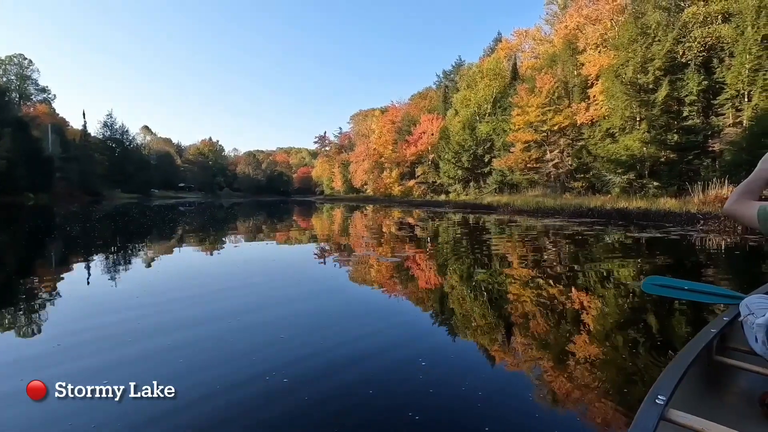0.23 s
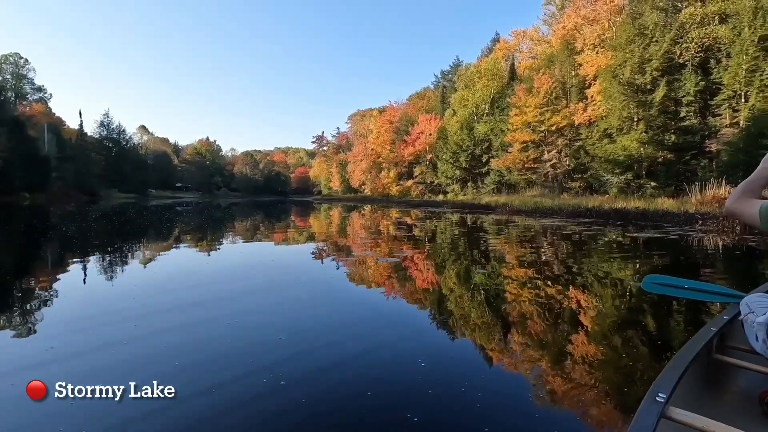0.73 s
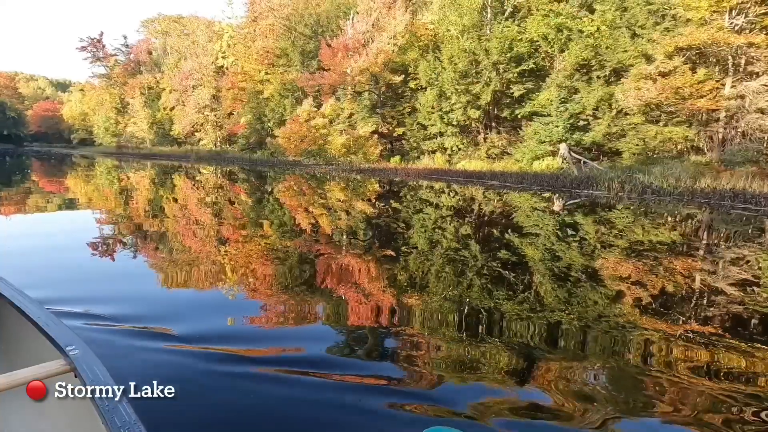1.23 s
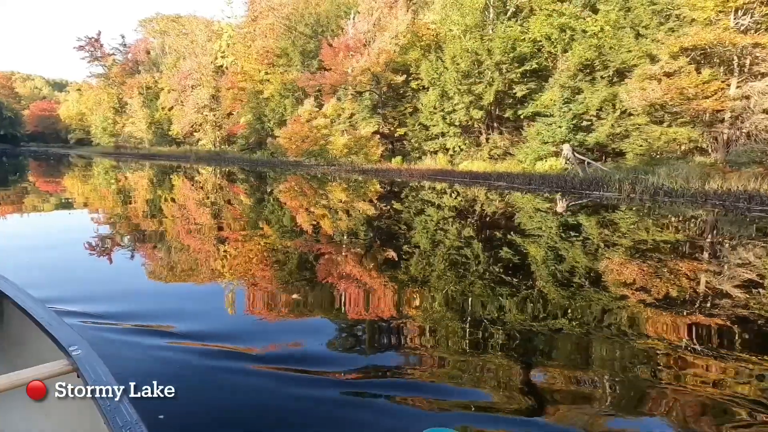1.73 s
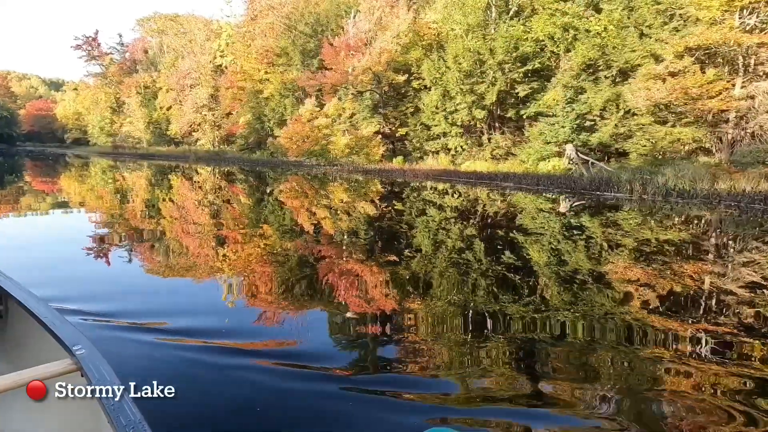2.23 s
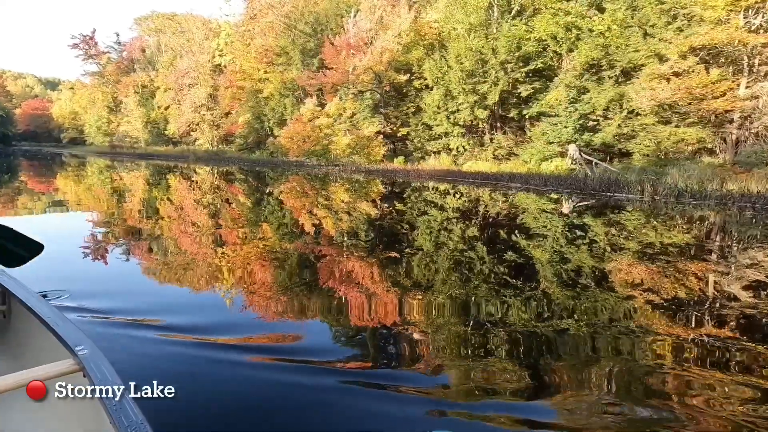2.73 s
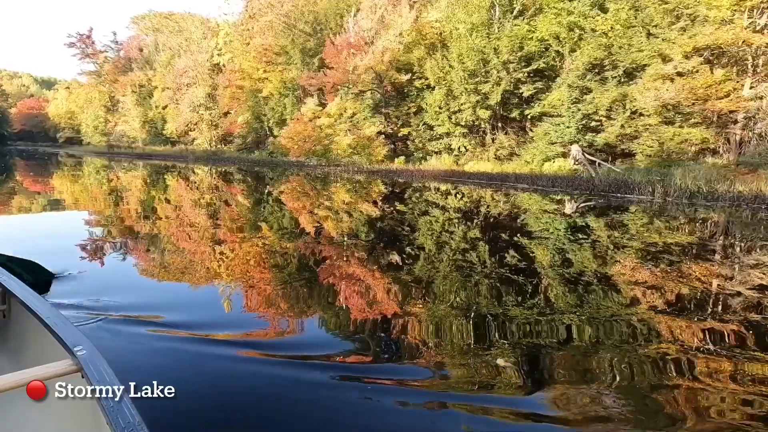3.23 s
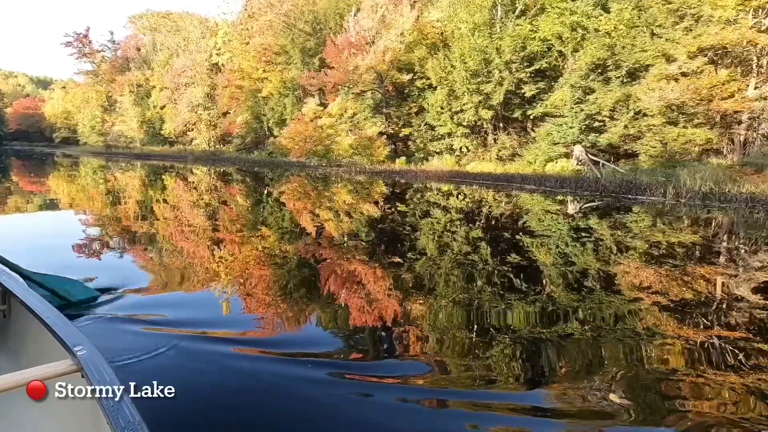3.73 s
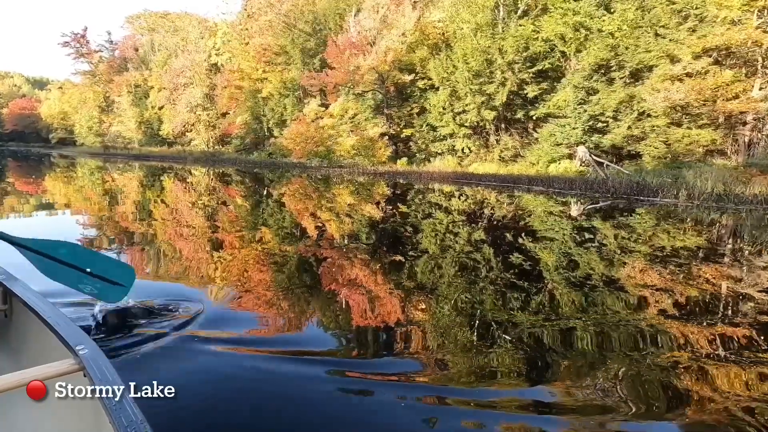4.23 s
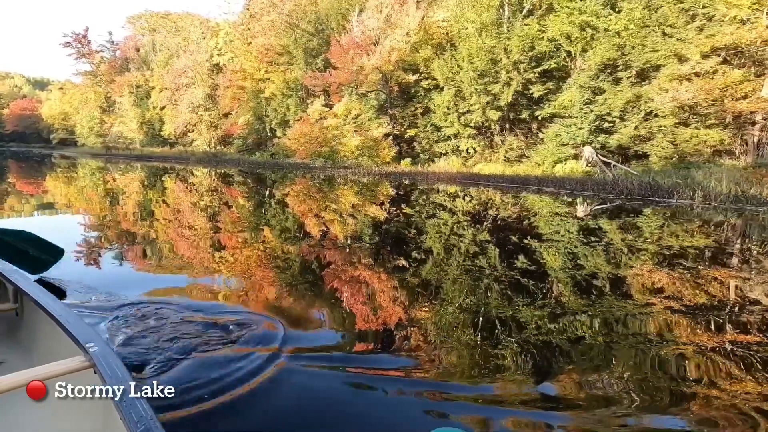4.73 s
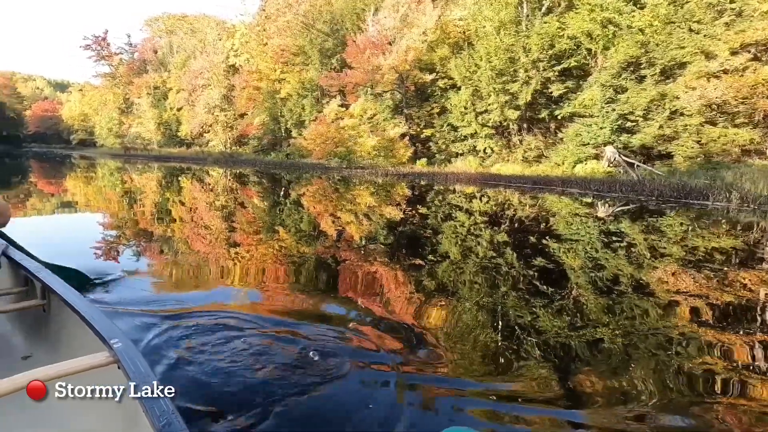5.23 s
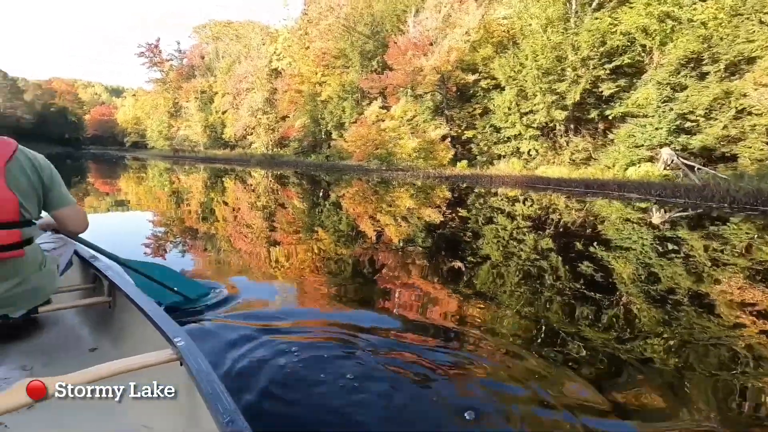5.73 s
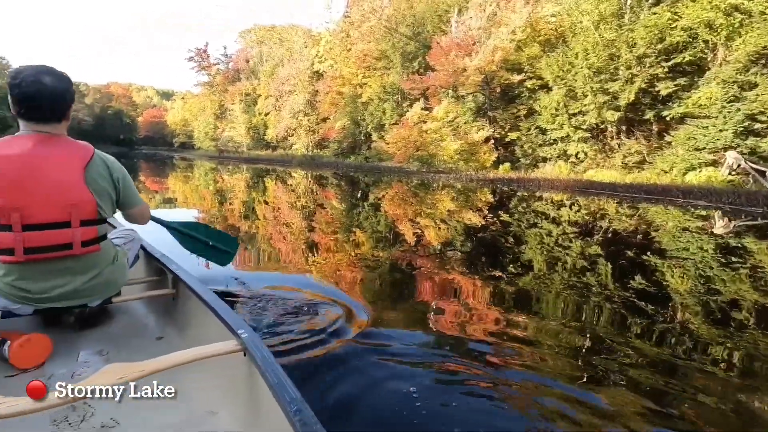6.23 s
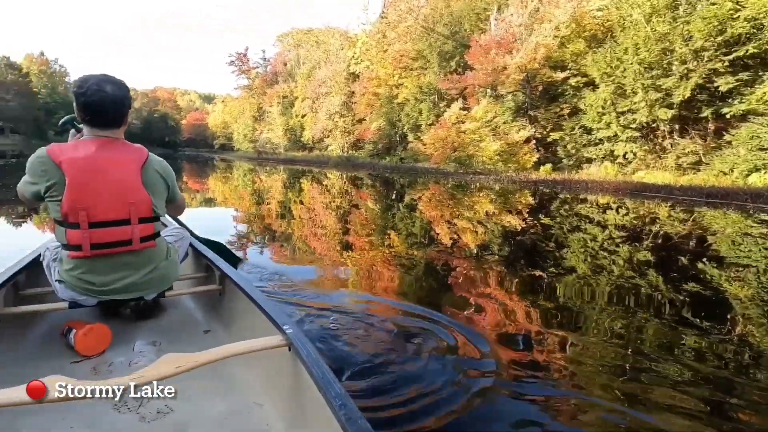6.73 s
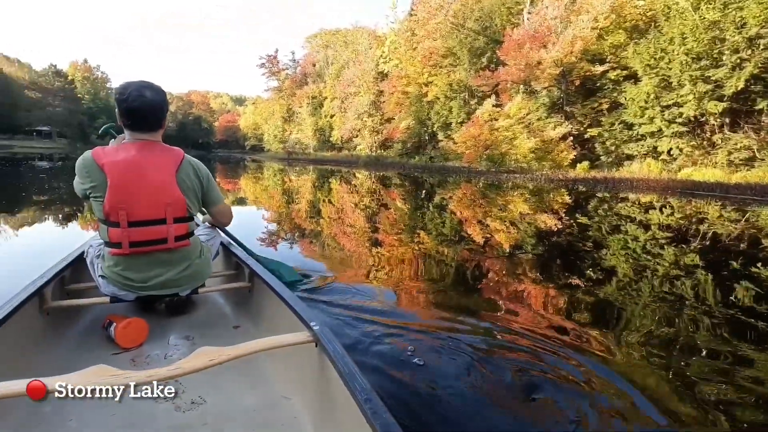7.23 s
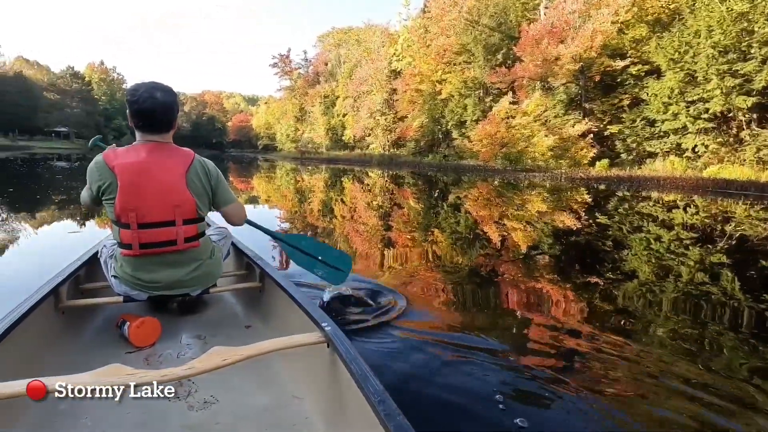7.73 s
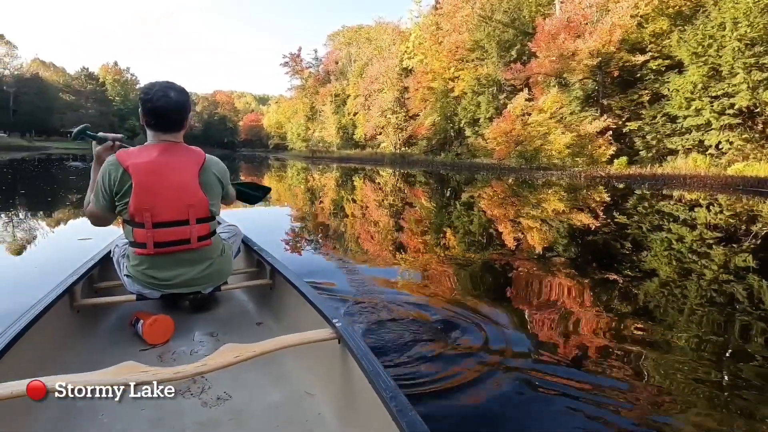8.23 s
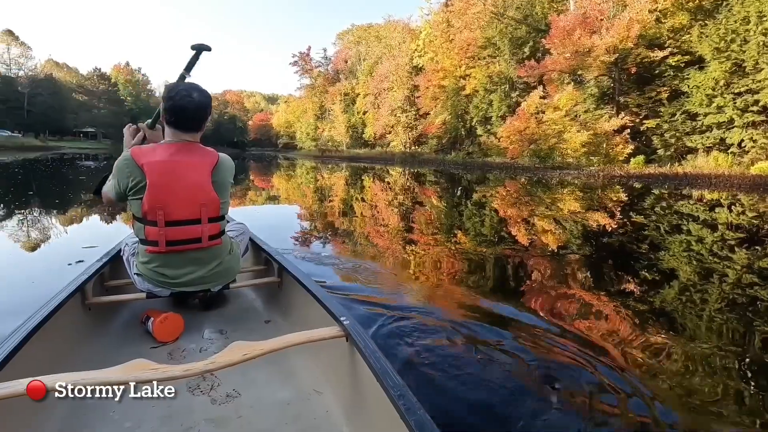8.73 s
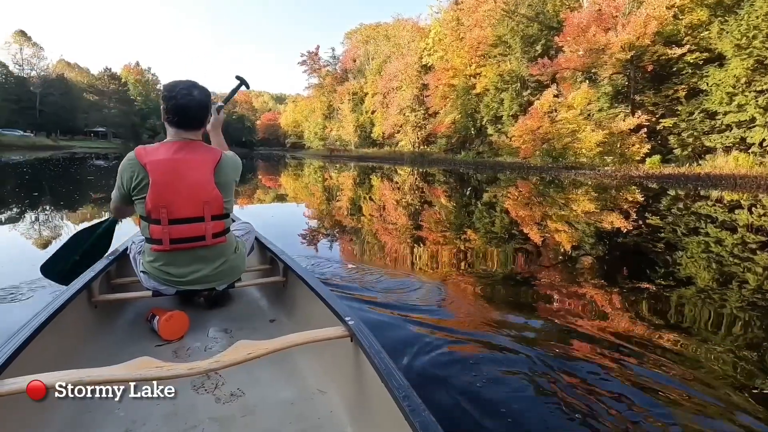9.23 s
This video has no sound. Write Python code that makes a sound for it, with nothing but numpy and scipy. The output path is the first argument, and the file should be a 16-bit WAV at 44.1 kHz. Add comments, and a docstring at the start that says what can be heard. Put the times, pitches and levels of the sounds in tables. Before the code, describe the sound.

Quiet outdoor lake ambience with soft wind rumble, nasal bird notes and chirps echoing off trees, and faint gliding motor drones. After a short gap of silence, a paddle close to the microphone plops, swirls and drips in three strokes of growing strength. A hollow boat knock booms between the first and second. The sound starts wide, becomes nearly mono, then gradually opens again and ends in a fade.

```python
"""On a calm lake, in the stern of a canoe: the paddle works close to a stereo microphone.
Strokes stir ringing bubbles, pattering drops and swishing noise; bumps set off the hull's decaying modes,
once loudly. Birds sing from the shore as harmonics, gliding tones and chirps, with an echo off the trees.
Far motors are gliding tones; rumble, rustle and hush are shaped noise. The sound fades out briefly,
comes back centred, slowly widens, and fades for good."""
import sys
import numpy as np
from scipy import signal
from scipy.fft import rfft, irfft, next_fast_len
from scipy.io import wavfile
from scipy.ndimage import uniform_filter1d

SR = 44100
rng = np.random.default_rng(int(sys.argv[2]) if len(sys.argv) > 2 else 0)


def inscribe(sig):
    """Save sig as 16-bit PCM at rate SR to the path in sys.argv[1].

    A 1-D sig is mono; a 2-D sig holds one channel per row.
    Samples are clipped to [-1, 1] before scaling.
    """
    pcm = np.round(np.clip(np.atleast_2d(sig).T, -1, 1) * 32767)
    wavfile.write(sys.argv[1], SR, pcm.astype(np.int16))


N = 418509
TIME = np.arange(N) / SR

# Levels in the tables are nominal: the functions and scene() still trim them.
# Close by: clearest single bubbles and drops; snap is set against the ring
# columns: start_s, peak_db, pitch_hz, t60_s, snap_db
PLOPS = [(.551, -53, 1172, 0.127, -20.5), (1.287, -50.5, 8690, 0.0031, -25), (3.113, -33, 2212, 0.025, -19),
         (3.115, -30.5, 1242, 0.015, -13), (3.122, -28, 2250, 0.0034, -11.5),
         (3.104, -40, 1290, 0.01276, -14), (3.148, -50.5, 1105, 0.034, -22), (3.176, -51, 870, 0.02, -12),
         (3.87, -45.5, 2300, .012, -7), (3.937, -48, 1398, 0.029, -20), (3.962, -46, 1223, 0.057, -27),
         (4.058, -47.5, 4910, 0.016, -24.5), (4.107, -34.5, 2210, 0.01, -21.5),
         (4.152, -42, 1198, 0.0243, -6), (4.16, -49, 756, 0.043, -10.5), (4.228, -37.5, 1377, 0.011, -20.5),
         (4.6, -32.5, 2870, 0.005, -9.5), (4.622, -34.5, 1406, 0.0186, -16), (4.648, -33, 1510, 0.027, -16),
         (4.675, -44, 1588, 0.024, -12), (4.701, -31, 1649, 0.0233, -13), (4.782, -35, 2060, 0.0063, -15),
         (4.931, -42, 2395, 0.0127, -28.5), (4.981, -37, 5270, 0.0035, -18.5),
         (5.091, -43, 2320, 0.011, -19.5), (5.303, -41.5, 783, 0.027, -12.5),
         (5.636, -35.5, 1040, 0.0164, -21), (5.648, -38, 2052, 0.034, -25.5), (5.66, -33, 1353, 0.022, -18),
         (5.686, -31.5, 1348, .059, -24), (5.723, -32.5, 1290, 0.0174, -22),
         (5.736, -25, 1188, 0.012, -16.5), (5.81, -39, 2750, 0.0135, -18.5),
         (5.855, -38.5, 1404, 0.0168, -15), (5.873, -33.5, 2800, 0.0113, -13),
         (5.911, -34.5, 992, 0.095, -24), (5.917, -29, 1313, 0.0185, -14),
         (5.934, -29.5, 1190, 0.0347, -12), (5.955, -32.5, 1101, 0.052, -25.5),
         (6.018, -38.5, 2230, .015, -23), (6.052, -32.5, 2714, 0.0113, -13.5),
         (6.19, -36.5, 2173, 0.017, -23.5), (6.233, -39.5, 2461, 0.0146, -19),
         (7.067, -32, 3016, 0.014, -23), (7.175, -32.5, 682, 0.068, -27), (7.191, -30.5, 1107, 0.0217, -22),
         (7.218, -29, 567, 0.044, -29.5), (7.232, -30.5, 625.5, 0.04, -25),
         (7.253, -32.5, 658.1, 0.055, -17), (7.295, -34, 1659, 0.013, -25),
         (7.53, -28.5, 1295, 0.015, -8.5), (7.535, -31, 3210, 0.018, -18), (7.549, -34.5, 2915, 0.017, -22),
         (7.583, -35, 944, 0.025, -9.5), (7.622, -21, 1099, 0.0135, -23),
         (7.625, -35.5, 554.6, 0.091, -26.5), (7.662, -35.5, 1120, 0.02, -20),
         (7.71, -33, 1011, 0.0384, -23), (7.742, -23.5, 1319, 0.016, -21.5),
         (7.766, -34.5, 1428, 0.0206, -17.5), (7.799, -36, 1220, 0.027, -23),
         (7.823, -27, 1212, 0.0255, -21), (7.91, -28, 3920, .0024, -21.5),
         (7.964, -30, 2398, 0.0247, -18.5), (7.976, -27.5, 2190, 0.0033, -19.5),
         (7.998, -31, 1256, 0.0044, -17), (8.003, -27, 5370, 0.0039, -23), (8.077, -28, 1666, 0.0037, -12),
         (8.114, -35, 1707, 0.015, -22), (8.169, -42, 1282, 0.0099, -11.5),
         (8.217, -35.5, 1459, 0.053, -28), (8.311, -35.5, 913, 0.036, -15.5),
         (8.376, -38.5, 1670, 0.0187, -15.5), (8.424, -35, 1570, 0.019, -23.5),
         (8.46, -36, 1418, 0.0127, -24.5), (8.484, -36, 5600, 0.0054, -25), (8.493, -32, 1760, 0.0065, -19),
         (8.524, -31, 1613, 0.0102, -26), (8.593, -31.5, 1744, 0.024, -34)]
# snap of the closing surface: pitch_hz, level_db_per_hz
SNAP = [(400, -12), (1200, 14.0), (3000, 11.5), (4200, -3.5), (7000, -2.0), (13000, -49.0)]
# bubbles that glide upward as they surface: start_s, peak_db, start_hz, end_hz, length_s
BLOOPS = [(2.035, -46.5, 189.2, 281, 0.061), (3.254, -54.5, 1063, 2120, 0.0334),
          (3.766, -53.5, 966, 1500, 0.033), (3.874, -52, 1094, 1550, 0.044),
          (4.301, -50, 1137, 1510, 0.045), (4.372, -47, 1288, 1600, 0.0168), (4.623, -41, 1017, 1410, .03),
          (4.647, -44.5, 2224, 2930, 0.021), (4.691, -46, 1453, 1820, 0.0266),
          (7.095, -41, 900, 1380, 0.03), (7.12, -39.5, 264.4, 350, 0.0584),
          (7.149, -37.5, 295, 450, 0.0626), (7.215, -40.5, 449.7, 600, 0.0365),
          (7.253, -44, 1276, 1700, 0.026), (7.434, -46.5, 980, 1350, .026), (7.595, -38.5, 510, 643, 0.036),
          (7.997, -40.5, 366, 420, 0.044), (8.306, -42.5, 314, 375, 0.045), (8.51, -48, 255, 331, 0.0434)]
# drops flung off the blade that strike with a dry tick: start_s, level_db
SPATS = [(3.121, -37), (3.622, -60), (4.122, -51), (4.157, -49), (4.164, -47), (4.387, -47.5), (4.399, -48),
         (4.791, -49.5), (4.98, -48), (5.797, -54), (6.059, -46.5), (6.147, -49), (6.164, -48),
         (6.184, -48), (6.232, -49), (6.686, -47), (6.797, -52), (7.342, -52), (7.594, -46), (7.757, -42.5),
         (8.164, -47.5)]
# colour of that tick: pitch_hz, level_db_per_hz
SPAT_COLOUR = [(1500, -10), (3500, -1), (6500, -0.5), (8500, -7), (14000, -24)]
# a drop meeting the surface: pitch_hz, level_db_per_hz
PAT_COLOUR = [(400, -24.5), (1300, -0.5), (2600, -0.5), (4500, -15), (7500, -26), (11000, -48),
              (15000, -65)]

# Phases of the strokes, all with columns: start_s, length_s, level_db
# the blade cuts the surface with a short splash
SPLASHES = [(3.109, 0.013, -43.5), (3.57, .06, -69), (4.385, .065, -62), (7.44, 0.036, -59)]
# the blade drags large pockets of air under
GULPS = [(4.45, 0.096, -64.5), (5.42, 0.3, -62.5), (6.04, 0.041, -58.5), (6.86, .02, -58.5),
         (7.14, 0.13, -42.5), (7.38, 0.17, -52.5), (7.6, 0.41, -52.5), (8.3, 0.03, -50)]
# the three strokes: water swirls behind the pulled blade
PULLS = [(3.85, 0.617, -63), (5.5, 0.67, -61), (7.08, 1.057, -58.5)]
# the water boils up at the end of a hard pull
BOILS = [(4.36, 0.077, -58), (5.82, 0.13, -50), (7.58, 0.23, -46), (7.87, 0.093, -50)]
# water tears off the blade as it turns and lifts
SPRAYS = [(4.12, 0.04, -62), (4.38, 0.059, -57.5), (5.8, 0.14, -68), (6.12, 0.1195, -59.5),
          (7.58, .42, -62), (8.08, 0.14, -62.5)]
# water runs off the raised blade onto the lake
DRIBBLES = [(4.22, 0.037, -56), (4.305, .11, -58), (4.555, .01, -57), (4.595, .105, -51.5),
            (5.02, .08, -67.5), (5.64, 0.076, -54.5), (6.89, .04, -55.5), (8.37, 0.18, -48.5),
            (8.77, 0.11, -59)]
# ripples lap along the moving hull: start_s, end_s
LAPPING_S = (3.95, 9.17)
LAPPING_DB = -73

# Character of each movement; attack and release each span 20 dB
# columns: centre_hz, below_db_per_octave, above_db_per_octave, attack_s, release_s
SPLASH = (1399, -7.5, -0.1, 0.001, 0.0186)
# air pockets dragged under, same columns
GULP = (701.5, -1, -11.5, 0.1, 0.17)
# swirl behind the blade, same columns
PULL = (1399.5, -12.5, -6.5, 0.12, 0.03)
# water boiling up, same columns
BOIL = (1650, -10, -6, 0.1558, 0.19)
# water torn off the blade, same columns
SPRAY = (8399, -3, -1.5, 0.07, 0.22)
# water running off the blade, same columns
DRIBBLE = (1557, -23, -15, 0.11, 0.16)
# ripples along the hull, same columns
LAP = (1559.5, -4.5, -1, 0.8, 2.7)
# stretch that holds bubbles and patter: start_s, end_s
STIRRED_S = (3.05, 9.0)
# colour of all stirred water: pitch_hz, level_db
CHURN_COLOUR = [(350, -7.5), (480, -10), (600, -5.5), (800, -12.5), (1150, 4), (1700, -2), (2400, 1.5),
                (3200, 3), (4200, -2.5), (5500, 0), (7500, -6), (10000, -9), (13000, -19.5)]
# where the blade works: time_s, left_minus_right_db
BLADE_SIDE = [(4.3, 2.5), (5.9, -0.12), (7.2, -2), (7.8, -3.5)]
# short reflections from the boat: pitch_hz, t60_s
BOAT_ECHO = [(300, 0.07), (2000, 0.0589), (10000, 0.0533)]

# bumps on the hull: start_s, thud_db, click_db
BUMPS = [(2.835, -46.5, -52), (4.122, -51.5, -46), (5.212, -15.5, -32.5), (6.188, -49.5, -53)]
# main hull modes once settled: pitch_hz, level_db, t60_s
HULL = [(74.1, -2, 0.42), (119.8, -4, .44), (170.6, -.5, .28), (204, -2, .19), (244.5, -2, 0.2),
        (300.5, -2.5, .125), (356, -16, .13), (392, -12, .12), (547, -23, 0.11), (600, -16, 0.083),
        (770, -18.5, .06)]
# click on the rim: pitch_hz, level_db_per_hz
CLICK = [(100, -8), (500, -2.5), (1200, 7), (2600, -3), (4000, -9.5), (5600, -13), (8000, -20.5),
         (11000, -41.5), (14000, -55)]
# the hull's countless lesser modes: pitch_hz, level_db_per_hz
SHELL = [(60, -22), (200, 2), (350, 4), (480, -13.5), (750, -9), (1300, -17.5), (3000, -51.5), (12000, -90)]
# their decay: pitch_hz, t60_s
SHELL_T60 = [(100, .36), (300, .18), (700, .11), (2000, .08)]

# On the shore: runs of short nasal bird notes: first_s, last_s, first_db, last_db
NOTE_RUNS = [(0.096, 0.341, -70.5, -68.5), (0.896, 1.484, -66.5, -71), (2.295, 3.248, -72, -67.5),
             (5.365, 7.225, -68.5, -61), (8.101, 8.68, -72.5, -66)]
NOTE_GAP_S = .2  # rounded so that a whole number of gaps fills each run
# longer nasal calls: start_s, level_db
LONG_NOTES = [(.88, -68), (1.697, -63), (2.65, -66.5), (3.353, -67), (4.2, -65.5), (5.075, -65.5),
              (6.669, -60), (7.347, -55), (8.07, -59), (8.86, -58)]
NOTE_S, LONG_NOTE_S = .068, .094
NOTE_HZ, LONG_NOTE_HZ = 520, 855  # nominal pitch at the top of the arch
# resonance of the nasal voice: pitch_hz, level_db
THROAT = [(2100, -18), (2550, -5.5), (3000, 0), (3400, 5), (3750, -3), (4250, -7), (5100, 0.5), (6000, -38)]
# thin whistles that drop onto a quavering note: start_s, level_db, pitch_hz
WHISTLES_HIGH = [(.065, -71, 7417), (2.003, -70, 7290), (3.69, -81.5, 7406), (5.254, -82, 7920),
                 (8.73, -77, 7000)]
# a whistle starts this share above its pitch; the excess decays with this time constant
WHISTLE_S, WHISTLE_DROP, WHISTLE_DROP_S = 0.1464, .24, .024
# short arched chips sung with two voices: start_s, level_db, pitch_hz
CHIPS = [(1.14, -74.5, 5270), (2.083, -74, 5260), (2.61, -75.5, 5300), (3.775, -78.5, 5340),
         (5.055, -72.5, 5445), (7.328, -60, 5413), (7.608, -59, 5252), (7.921, -62, 5340)]
CHIP_S = 0.05
# chip pitch over its middle pitch: start_ratio, end_ratio
CHIP_GLIDE = (.85, .93)
# dry bird ticks that plunge through the treble: start_s, level_db, start_hz, end_hz
TICKS = [(1.146, -65.5, 5580, 2903), (2.447, -66, 4194, 2640), (2.714, -63.5, 5280, 2994)]
TICK_S = 0.019
# level of a buzzy bird trill: time_s, level_db
TRILL = [(0, -76), (.2, -77), (.5, -72), (.62, -73.5), (.7, -110)]
TRILL_HZ, TRILL_PER_S = 4560, 50  # middle of each chirp; chirps a second
# hoarseness of the trill: pitch_hz, level_db_per_hz
HOARSE = [(0, 0), (200, 0), (600, -40), (2000, -90)]
# echo from the trees: pitch_hz, t60_s
SHORE = [(200, .3), (1000, .34), (3400, 0.629), (5500, 0.25), (8000, 0.57), (14000, .15)]
SHORE_DB = -5.5

# Far over the water: upper motor drone: time_s, pitch_hz, level_db
DRONE = [(.85, 165.2, -48.5), (1.15, 165.9, -47.5), (1.85, 166.1, -56), (2.1, 174, -54.5),
         (2.5, 178.2, -51), (3.63, 181.4, -49), (4.2, 181.1, -53.5), (4.9, 175, -55), (5.5, 169.8, -53),
         (5.9, 166.2, -54.5), (6.55, 167.1, -46.5), (7.25, 163.7, -54), (7.92, 162.7, -55)]
# lower motor drone: time_s, pitch_hz, level_db
LOW_DRONE = [(4.45, 55.94, -49.5), (4.85, 66.4, -44), (5.55, 67.95, -44.5), (6.0, 72.45, -41.5),
             (6.65, 74, -39.5), (7.05, 67.45, -40.5), (7.45, 57, -48.5), (7.95, 58.04, -45),
             (8.15, 50.1, -56.5), (8.7, 70, -55.5), (8.9, 76, -41.5)]
# wavering of their level: rate_hz, level_db_per_hz
DRIFT = [(1, 5), (6, 3), (20, -17), (80, -72), (300, -120)]

# At the microphone: air rumble: time_s, level_db
AIR = [(0, -41.5), (.6, -44), (1.1, -38.5), (2.0, -44), (3.4, -42.5), (4.8, -44.5), (5.45, -37),
       (5.8, -40.5), (6.6, -42), (7.9, -41.5), (8.7, -46.5), (8.92, -42)]
# colour of the rumble: pitch_hz, level_db_per_hz
RUMBLE = [(12, 2), (25, 6), (45, -9.5), (70, -10.5), (110, -13.5), (160, -16.5), (210, -15.5), (270, -31),
          (400, -37.5), (900, -85)]
# thin high rustle: time_s, level_db
HISS = [(0, -67.5), (.9, -96), (1.9, -81.5), (2.1, -72.5), (2.45, -68), (2.85, -67.5), (3.2, -78),
        (3.7, -88), (4.2, -77), (4.9, -77.5), (7.0, -75), (7.9, -68.5), (8.9, -76)]
# colour of the rustle: pitch_hz, level_db_per_hz
RUSTLE = [(1500, -16), (3000, -10), (4500, -2), (5800, -0.5), (7500, -3.5), (9500, -11), (12500, -13.5),
          (14000, -15)]
# colour of the lake's hush: pitch_hz, level_db_per_hz
LAKE = [(180, -30.5), (300, 2.5), (394, -6.5), (813, -11), (1250, -8), (2200, -17.5), (3460, -12.5),
        (3870, -17), (7720, -21.5), (11500, -47), (14000, -54)]
LAKE_DB = -72
# likeness of the two channels of wide noise: pitch_hz, correlation_ratio
SAME = [(30, 0.89), (150, 1), (600, 0.44), (3000, 0.728), (8000, 0.77), (13000, 0.44)]
# stereo image, narrowing to the centre and slowly opening again: time_s, width_ratio
WIDTH = [(.65, 1), (.8, 0.0098), (3, 0.013), (4.5, 0.36), (6, 0.97), (7.3, 0.96)]
# brief fade out, return and final fade: time_s, gain_ratio
FADER = [(0, 1), (.58, 1), (.645, 0), (.805, 0), (.87, 1), (8.92, 1), (9.005, 0)]
EDGE_HZ = 13700  # upper band limit


def plops(rise=0.087, snap_s=0.005, swell_cycles=0.6):
    """Each clear plop is a ringing bubble with the brief snap of the closing surface."""
    out, t = np.zeros(N), np.arange(4096) / SR
    for s, db, hz, t60, snap_db in PLOPS:
        ring = bubble(t, hz, t60, rise * rng.uniform(0.41, 1.8), swell_cycles)
        snap = coloured(SNAP, len(t)) * struck(t, snap_s)
        add(out, s, amp(db) * (ring / abs(ring).max() + amp(snap_db) * snap))
    return out


def bloops():
    """A slow bubble swells, then sweeps up in pitch as it fades."""
    out, fade_db, bend = np.zeros(N), 10, 1.4
    for s, db, start_hz, end_hz, length in BLOOPS:
        u = np.linspace(0, 1, int(length * SR))
        turns = np.cumsum(start_hz + (end_hz - start_hz) * u ** bend) / SR
        envelope = amp(db - fade_db * u ** 2) * signal.windows.tukey(len(u), .5)
        add(out, s, envelope * np.sin(2 * np.pi * turns))
    return out


def spats(spat_s=0.0024):
    """A fast drop hits flat water and traps no air: a bright, dry tick."""
    out, t = np.zeros(N), np.arange(1024) / SR
    for s, db in SPATS:
        size = rng.uniform(.85, 1.15)
        colour = [(hz * size, level) for hz, level in SPAT_COLOUR]
        add(out, s, amp(db) * coloured(colour, len(t)) * struck(t, spat_s))
    return out


def churn():
    """Water stirred by the blade: clusters of bubbles and a patter of drops over a soft swish."""
    patter_db, swish_db = -12, -16.5
    return amp(-0.46) * swarm() + amp(patter_db) * patter() + amp(swish_db) * wash()


def swarm(spread_db=4.0, count=12000):
    """Small bubbles break loose in clusters; large ones ring longer and glide upward, the finest only tick."""
    calm_per_s, ring_s, rise, swell_share, cluster_db = 520, .028, .22, .4, 2.5
    out, (first, last) = np.zeros(N), STIRRED_S
    when, pitch, chance, size, ringing, glide, softness = rng.random((count, 7)).T
    s, hz = first + (last - first) * when, 330 * 38 ** pitch
    db = churn_db(s, hz)
    bulk = (1500 / hz) ** .75  # larger for deeper bubbles
    # stronger water breeds more bubbles; each one's gain allows for the crowd
    per_s = np.clip(calm_per_s * amp((db + 65) / 2), calm_per_s, count / (last - first))
    size_db = spread_db * np.minimum(bulk, 1) * np.minimum(-np.log(size), 3.5)
    gain = amp(db + size_db) * np.sqrt(SR / per_s)
    t60 = np.minimum(ring_s * bulk * 2 ** (2 * (ringing - .5)), .06)
    swell = .5 + 2 * swell_share * softness ** 2 * t60 * hz  # some pinch off sharply, others well up
    climb = rise * glide * np.minimum(bulk, 1) ** 2
    crowding = amp(cluster_db * np.interp(s, TIME, flutter(30)))
    kept = chance < crowding / crowding.mean() * per_s * (last - first) / count
    for k in np.flatnonzero(kept):
        ring = bubble(np.arange(int(t60[k] * SR)) / SR, hz[k], t60[k], climb[k], swell[k])
        add(out, s[k], gain[k] * ring / np.linalg.norm(ring))
    return out


def patter(spread_db=3.5, pat_s=0.0018, count=12):
    """Drops pat on the surface in a dozen colours, louder as the water is stirred harder."""
    per_s, out, t = 110, np.zeros(N), np.arange(1024) / SR
    first, last = STIRRED_S
    at = rng.integers(round(first * SR), round(last * SR), round(per_s * (last - first)))
    strength_db = churn_db(at / SR, np.full(len(at), 2000))
    size_db = spread_db * np.minimum(rng.exponential(1, len(at)), 3)
    gain = amp(strength_db + size_db) * np.sqrt(SR / per_s)
    pats = []
    for size in np.geomspace(.7, 1.5, count):
        colour = [(hz * size, db) for hz, db in PAT_COLOUR]
        pat = coloured(colour, len(t)) * struck(t, pat_s)
        pats.append(pat / np.linalg.norm(pat))
    for k, (i, g) in enumerate(zip(at, gain)):
        add(out, i / SR, g * pats[k % count])
    return out


def wash(flutter_db=3.5, tilt_db=-.5):
    """The soft, fluttering swish of torn water under the bubbles, as bands of noise."""
    out, t = np.zeros(N), TIME[::128]
    for hz in np.geomspace(290, 11000, 12):
        sos = signal.butter(2, [hz / 1.19, hz * 1.19], "band", fs=SR, output="sos")
        band = signal.sosfilt(sos, rng.standard_normal(N))
        wobble = evened(uniform_filter1d(rng.standard_normal(len(t)), size=5))
        level_db = churn_db(t, hz) + flutter_db * wobble + tilt_db * np.log2(hz / 1500)
        out += evened(band) * np.interp(TIME, t, amp(level_db))
    return out


def churn_db(t, hz):
    """Strength of the stirred water at times t and pitches hz: the power of all stroke phases adds up."""
    parts = [LAPPING_DB + stir_db(t, hz, *LAPPING_S, LAP)]
    phases = ((SPLASHES, SPLASH), (GULPS, GULP), (PULLS, PULL),
              (BOILS, BOIL), (SPRAYS, SPRAY), (DRIBBLES, DRIBBLE))
    for rows, kind in phases:
        parts += [db + stir_db(t, hz, s, s + length, kind) for s, length, db in rows]
    power = sum(amp(db) ** 2 for db in parts)
    return 10 * np.log10(power + 1e-20) + read(CHURN_COLOUR, hz)


def stir_db(t, hz, start, end, kind):
    """A movement of the water rises, holds from start to end and dies, with bubbles around one size."""
    centre_hz, below_db, above_db, attack_s, release_s = kind
    octaves = np.log2(hz / centre_hz)
    outside = np.maximum(start - t, 0) / attack_s + np.maximum(t - end, 0) / release_s
    return below_db * np.maximum(-octaves, 0) + above_db * np.maximum(octaves, 0) - 20 * outside


def bubble(t, hz, t60, rise, swell_cycles=0.392):
    """A pocket of air swells, rings and dies; its pitch climbs as it nears the surface."""
    turns = hz * t * (1 + rise * (t / t60 - .4))
    swelling = 1 - np.exp(-(hz * t / swell_cycles) ** 2)
    return np.sin(2 * np.pi * turns) * amp(-60 * t / t60) * swelling


def struck(t, decay_s):
    """Envelope of water meeting water: a quick but rounded rise, then a decay."""
    rise_s = .0007
    return 1.2 * (1 - np.exp(-t / rise_s)) * np.exp(-t / decay_s)


def hull(swell_s=0.014, click_s=0.0075, shell_db=-12.5, sag=.06):
    """A blow clicks on the rim and the hollow hull booms; modes sag in pitch, low ones build up slowest."""
    out, t = np.zeros(N), np.arange(SR // 2) / SR
    sag_s, lowest_hz = .03, HULL[0][0]
    sagging = t + sag * sag_s * (1 - np.exp(-t / sag_s))  # sharp at first, as the wall relaxes
    boom = np.zeros(len(t))
    for hz, db, t60 in HULL:
        build_up = 1 - np.exp(-t / (swell_s * (lowest_hz / hz) ** 2))
        boom += amp(db - 60 * t / t60) * np.sin(2 * np.pi * (hz * sagging + rng.random())) * build_up
    push = coloured(SHELL, len(t)) * t * np.exp(-t / .004)
    shell = echo(push, SHELL_T60)[0, :len(t)]
    boom += amp(shell_db) * shell / shell[:2048].std()
    for s, thud_db, click_db in BUMPS:
        click = coloured(CLICK, len(t)) * np.exp(-t / click_s)
        add(out, s, amp(thud_db) * boom + amp(click_db) * click)
    return out


def nasal_notes(long_db=-2, long_arch=.12):
    """Slightly hoarse harmonics: short arched notes in even runs, longer calls higher with few overtones."""
    out, arch, focus_db, rough = np.zeros(N), .22, 3, .02
    notes = []
    for first, last, first_db, last_db in NOTE_RUNS:
        count = round((last - first) / NOTE_GAP_S) + 1
        notes += [(s, NOTE_S, db, False) for s, db in np.linspace((first, first_db), (last, last_db), count)]
    notes += [(s, LONG_NOTE_S, db + long_db, True) for s, db in LONG_NOTES]
    for s, length, db, is_long in notes:
        u = np.linspace(-1, 1, int(length * SR))
        waver = evened(uniform_filter1d(rng.standard_normal(SR), 40))[:len(u)]
        if is_long:
            hz = LONG_NOTE_HZ * (1 - long_arch * u ** 2)
            orders = {3: 0, 4: focus_db, 5: 0, 6: -3}  # harmonic number: lift in dB
        else:
            hz = NOTE_HZ * rng.uniform(.95, 1.05) * (1 - arch * u ** 2)
            orders = {n: rng.normal(0, 3) for n in range(4, 9)}
        turns = np.cumsum(hz * (1 + rough * waver)) / SR
        note = sum(amp(read(THROAT, n * hz) + lift_db) * np.sin(2 * np.pi * n * turns)
                   for n, lift_db in orders.items())
        add(out, s, amp(db) * evened(note * signal.windows.tukey(len(u), .6)))
    return out


def chips(upper_db=-5, rough=0.012):
    """Arched chips with a second voice a little above the first, and dry plunging ticks."""
    out, u = np.zeros(N), np.linspace(0, 1, int(CHIP_S * SR))
    arch = np.polyval(np.polyfit([0, .5, 1], [CHIP_GLIDE[0], 1, CHIP_GLIDE[1]], 2), u)
    upper_ratio, tick_rough = 1.08, .08
    for s, db, hz in CHIPS:
        lower = sung(hz * arch, rough)
        upper = sung(upper_ratio * hz * arch, rough)
        add(out, s, amp(db) * (lower + amp(upper_db) * upper))
    for s, db, start_hz, end_hz in TICKS:
        add(out, s, amp(db) * sung(np.geomspace(start_hz, end_hz, int(TICK_S * SR)), tick_rough))
    return out


def whistles(quaver=.022, quaver_per_s=28):
    """High whistles drop quickly, then quaver around one note."""
    out, t, rough = np.zeros(N), np.arange(int(WHISTLE_S * SR)) / SR, .014
    drop = WHISTLE_DROP * np.exp(-t / WHISTLE_DROP_S)
    for s, db, hz in WHISTLES_HIGH:
        shake = quaver * np.sin(2 * np.pi * (quaver_per_s * t + rng.random()))
        add(out, s, amp(db) * sung(hz * (1 + drop + shake), rough))
    return out


def trill(sweep=.2):
    """A rapid run of tiny falling chirps, blurred into a buzz by the trees."""
    u = (TIME * TRILL_PER_S) % 1
    turns = np.cumsum(TRILL_HZ * (1 + sweep * (.5 - u))) / SR
    hoarse = 1 + .5 * coloured(HOARSE, N)
    chirps = hoarse * np.sin(np.pi * u) * np.sin(2 * np.pi * turns)
    return amp(follow(TRILL, TIME)[0]) * evened(chirps + .6 * echo(chirps, SHORE)[0])


def sung(hz, rough):
    """One soft-edged bird tone of rms 1 along a pitch curve, slightly unsteady."""
    waver = evened(uniform_filter1d(rng.standard_normal(len(hz)), size=40))
    turns = np.cumsum(hz * (1 + rough * waver)) / SR
    return evened(np.sin(2 * np.pi * turns) * signal.windows.tukey(len(hz), .5))


def drone(rows, octave_db):
    """A far motor note with a faint octave; it glides, and wavers a little on its way over the water."""
    hz, db = follow(rows, TIME)
    drift = 1 + .2 * coloured(DRIFT, N)
    sounding = np.clip(np.minimum(TIME - rows[0][0], rows[-1][0] - TIME) * 10 + 1, 0, 1)
    phase = 2 * np.pi * np.cumsum(hz) / SR
    tone = np.sin(phase) + amp(octave_db) * np.sin(2 * phase)
    return sounding * amp(db) * evened(drift * tone)


def air(puff_db=3.0):
    """Unevenly buffeting rumble on the microphone, a high rustle that comes in puffs, and the lake's hush."""
    buffet_db, puffs_per_s = 1.5, 9
    rumble_db = follow(AIR, TIME)[0] + buffet_db * flutter(puffs_per_s)
    rumble = amp(rumble_db) * wide_noise(RUMBLE, patchy_db=2)
    rustle_db = follow(HISS, TIME)[0] + puff_db * flutter(puffs_per_s)
    rustle = amp(rustle_db) * wide_noise(RUSTLE, patchy_db=.6)
    hush = amp(LAKE_DB) * wide_noise(LAKE, patchy_db=1)
    return rumble + placed(rustle, left_db=4.0) + hush


def flutter(per_s):
    """A random wobble of rms 1 that moves about per_s times a second."""
    return coloured([(0, -20), (per_s / 2, 0), (per_s, 0), (3 * per_s, -25), (10 * per_s, -90)], N)


def wide_noise(spectrum, patchy_db):
    """Stereo noise whose level drifts in patches of time and frequency."""
    hz = np.fft.rfftfreq(2048, 1 / SR)
    a, b, c, d, patches = rng.standard_normal((5, N // 512 + 5, len(hz)))
    patches = evened(uniform_filter1d(uniform_filter1d(patches, 8, 0), 20, 1))
    same = np.clip(read(SAME, hz), -1, 1)
    left = a + 1j * b
    right = same * left + np.sqrt(1 - same ** 2) * (c + 1j * d)
    z = np.array([left, right]) * amp(read(spectrum, hz) + patchy_db * patches)
    return evened(signal.istft(z.swapaxes(1, 2), nperseg=2048, noverlap=1536)[1][:, :N])


def coloured(spectrum, size):
    """Noise of rms 1 with the given spectrum."""
    n = next_fast_len(size)
    gain = amp(read(spectrum, np.fft.rfftfreq(n, 1 / SR)))
    return evened(irfft(rfft(rng.standard_normal(n)) * gain, n)[:size])


def echo(x, t60s):
    """Stereo tail: sparse taps of random sign, each band dying at its own speed."""
    taps = rng.choice([-1., 1.], (2, SR)) * (rng.random((2, SR)) < .06)
    taps *= np.arange(SR) > 90  # a gap of about 2 ms before the first reflection
    hz, t, z = signal.stft(taps, SR, nperseg=128)
    tail = signal.istft(z * amp(-60 * t / read(t60s, hz)[:, None]), SR, nperseg=128)[1]
    return signal.oaconvolve(x[None], tail / np.linalg.norm(tail[0]), axes=1)[:, :N]


def placed(x, left_db):
    """Leans a sound sideways: left_db is the left level minus the right."""
    return x * amp(left_db * np.array([[1], [-1]]) / 2)


def amp(db):
    """Decibels to gain."""
    return 10 ** (np.asarray(db) / 20)


def evened(x):
    """Scales to an rms of 1."""
    return x / np.sqrt(np.mean(x ** 2) + 1e-20)


def read(points, hz):
    """Reads a spectrum on a log-frequency axis."""
    f, value = np.transpose(points)
    return np.interp(np.log(hz + 1), np.log(f + 1), value)


def follow(rows, t):
    """Reads every column of a curve table at the times t."""
    s, *columns = np.transpose(rows)
    return [np.interp(t, s, c) for c in columns]


def add(mix, s, sound):
    """Mixes a sound in at s seconds."""
    part = mix[max(round(s * SR), 0):][:len(sound)]
    part += sound[:len(part)]


def scene():
    """Near water and hull with short reflections from the boat; far birds in the echo of the shore."""
    water = amp(-0.5) * plops() + amp(-1.5) * bloops() + spats() + churn()
    boat_echo = echo(water, BOAT_ECHO)
    at_blade = placed(water + amp(-13.5) * boat_echo[:1], follow(BLADE_SIDE, TIME)[0])
    near = at_blade + amp(-11.5) * boat_echo + hull()
    birds = amp(.5) * nasal_notes() + amp(-3.0) * trill() + amp(4.5) * whistles() + amp(3.5) * chips()
    shore_echo = echo(birds, SHORE)
    far = amp(-0.6) * placed(birds, left_db=6.0) + amp(SHORE_DB) * (shore_echo[:1] + .5 * shore_echo)
    motors = amp(-.5) * drone(DRONE, octave_db=-32) + amp(-1.5) * drone(LOW_DRONE, octave_db=-16)
    return near + far + motors + air()


def record(dry):
    """Stereo width, the fader, then the band limit."""
    mid = dry.mean(0)
    widened = mid + (dry - mid) * follow(WIDTH, TIME)[0]
    faded = widened * follow(FADER, TIME)[0]
    low_pass = signal.firwin(511, EDGE_HZ, window=("kaiser", 9), fs=SR)
    return signal.oaconvolve(faded, low_pass[None], "same")


dry = scene()
out = record(dry)
inscribe(out)
```